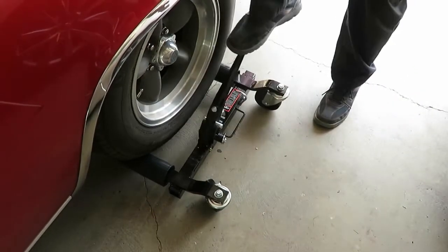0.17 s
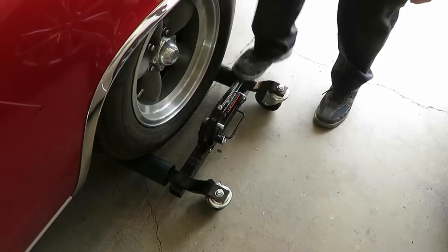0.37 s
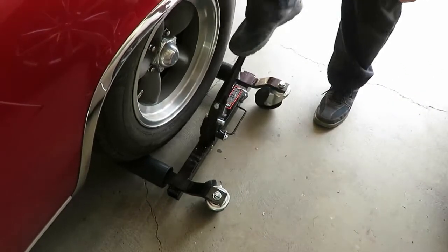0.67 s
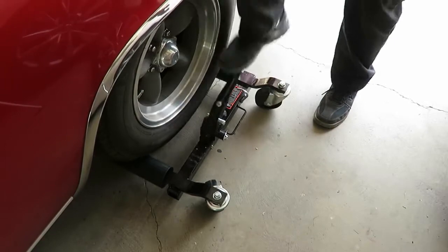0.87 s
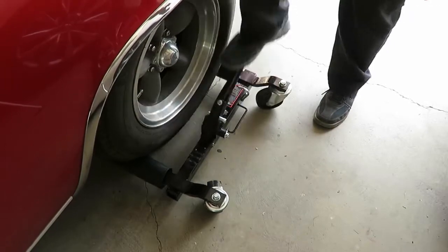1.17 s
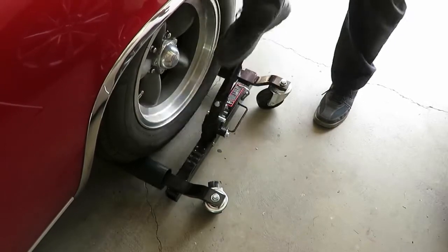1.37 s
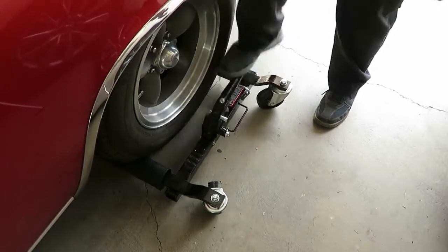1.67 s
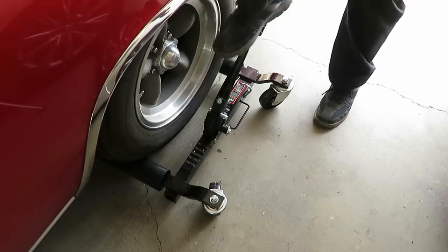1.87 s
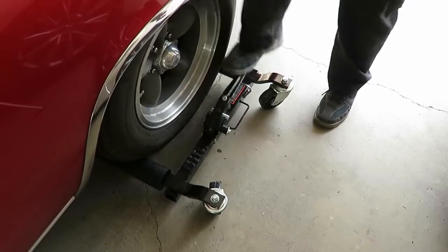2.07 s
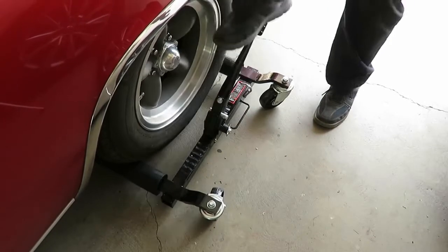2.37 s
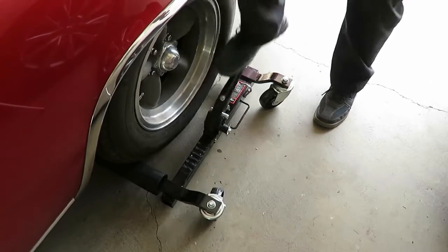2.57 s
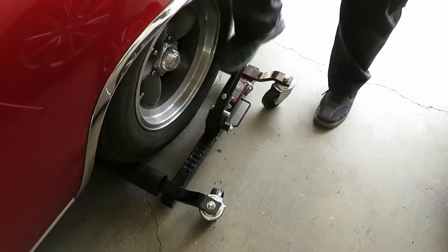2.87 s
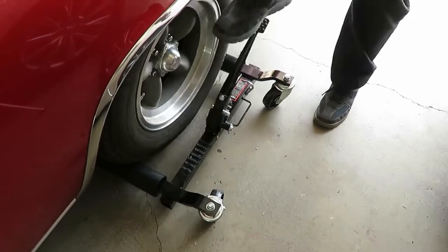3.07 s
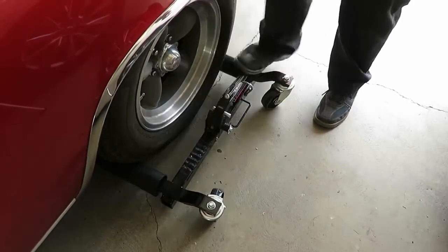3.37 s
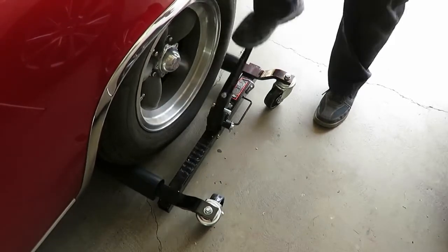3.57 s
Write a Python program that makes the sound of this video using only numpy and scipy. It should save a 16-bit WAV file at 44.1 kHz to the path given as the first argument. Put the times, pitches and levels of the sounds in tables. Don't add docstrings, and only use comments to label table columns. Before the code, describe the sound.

Close, loud ratchet clatter from a wheel dolly pedal, repeating about every half second, with creaks, faint pings and low tyre thumps; one brief squeak early on, hard-walled garage echo and faint outdoor air.

```python
import sys
import numpy as np
from scipy import signal
from scipy.fft import rfft, irfft
from scipy.io import wavfile
from scipy.ndimage import uniform_filter1d

SR = 44100
rng = np.random.default_rng(int(sys.argv[2]) if len(sys.argv) > 2 else 0)


def transcribe(signal):
    frames = np.atleast_2d(signal).T
    limited = np.clip(frames, -1, 1)
    pcm = np.round(limited * 32767).astype(np.int16)
    wavfile.write(sys.argv[1], SR, pcm)


def boost_factor(decibels):
    exponent = np.asarray(decibels, float) / 20
    return 10 ** exponent


N = 163170
LEAD = SR // 5


def evened(x):
    return x / np.sqrt(np.mean(x ** 2) + 1e-20)


def read(points, hz):
    f, value = np.transpose(points)
    return np.interp(np.log(hz + 1), np.log(f + 1), value)


def add(mix, s, sound):
    part = mix[..., LEAD + round(s * SR):][..., :sound.shape[-1]]
    part += sound[..., :part.shape[-1]]


def coloured(x, points):
    hz = np.fft.rfftfreq(x.shape[-1], 1 / SR)
    return irfft(rfft(x) * boost_factor(read(points, hz)), x.shape[-1])


def ringing(modes, length):
    t = np.arange(0, length, 1 / SR)
    return sum(boost_factor(db - 60 * t / t60) * np.sin(2 * np.pi * hz * t) for hz, db, t60 in modes)


def shaken(modes, force):
    body = ringing(modes, .6)
    jolts = force * rng.standard_normal(force.size)
    return signal.fftconvolve(jolts, body / np.linalg.norm(body))[:force.size]


def paired(z, hz):
    # frequency in Hz, left-right likeness from 0 to 1.
    likeness = [(100, 1), (600, 0.93), (2500, 0.86), (5000, 0.097), (10000, 0.017)]
    same = np.clip(read(likeness, hz), 0, 1)[:, None]
    return np.array([z[0], same * z[0] + np.sqrt(1 - same ** 2) * z[1]])


def air():
    # frequency in Hz, level in dB.
    air_colour = [(24, -26), (40, 8), (784, -26), (1780, -13), (7130, -25), (12600, -33), (15000, -31.5)]
    level_db = -44.5
    hz, _, z = signal.stft(rng.standard_normal((2, N)), SR, nperseg=1024)
    z = paired(z, hz) * boost_factor(read(air_colour, hz))[:, None]
    return boost_factor(level_db) * evened(signal.istft(z, SR, nperseg=1024)[1][:, :N])


def clacks():
    # start in seconds, peak in dB, thud share in dB, bright share in dB, strongest ring in Hz.
    first_clacks = [(.167, -13.5, -31, -18, 2200), (.189, -9, -16, -1, 5000),
                    (0.2007, -4, -11.5, -13, 3150), (.2262, -2.5, -18, -48, 2060),
                    (.2563, -8, -18, 1, 7300), (.358, -11, -23, -4.5, 7200), (.3676, -20, -38, 4, 5000),
                    (.4073, -19, -9.5, -6.5, 2720), (.4422, -16.5, -22, -21.5, 2260),
                    (.4856, -5, -17, -11.5, 1390), (.5325, -10.5, -17, -7.5, 2530),
                    (.595, -9.5, -8, -28, 2140), (.8129, -3, -22, -5.5, 1780), (.8405, -7, -8, -23, 2060),
                    (.8641, -4.5, -24, -1, 2130), (.879, -11.5, -19, -19, 2300),
                    (.8988, -8.5, -15, -11, 5000), (.9565, -11, -22, -2, 5500), (.9672, -5.5, -35, 0, 7000),
                    (1.0537, -13, -19, -15, 5060), (1.0852, -3, -9.5, -7, 4270),
                    (1.1246, -10.5, -37, -4.5, 6900)]
    middle_clacks = [(1.3569, -8, -29, -9, 1810), (1.3864, -4, -8, -9, 2070),
                     (1.4104, -5.5, -21, 1.5, 5870), (1.4378, -2.5, -14, -5, 2260),
                     (1.486, -12, -33, 3, 8000), (1.4976, -6.5, -34, 1, 6500),
                     (1.5429, -17.5, -16, -8, 5580), (1.6222, -13.5, -24, -15.5, 1740),
                     (1.657, -4.5, -9.5, -10, 1180), (1.693, -12, -12, -7.5, 1870),
                     (1.8926, -4, -28, -7, 5150), (1.9212, -5, -2.5, -3, 1940),
                     (1.9435, -5, -7, -1.5, 1930), (1.97, -6, -47, -13.5, 2260),
                     (2.0243, -13, -41, -1, 7000), (2.036, -12, -50, 3, 3330), (2.155, -30, 1, -17, 500),
                     (2.0812, -21.5, -27, -11, 2100), (2.096, -22, -31, -7.5, 3350),
                     (2.198, -12, -19, -10, 3330), (2.2256, -6.5, -14, -12, 2160),
                     (2.2711, -12.5, -27, -11, 2540)]
    last_clacks = [(2.4287, -16.5, 2, -11, 670), (2.462, -10, -37, -3, 2070), (2.4885, -5.5, -9, -11, 837),
                   (2.512, -3, -14, -4.5, 2940), (2.5358, -1.5, -21, -2, 4650), (2.59, -17, -46, -7, 7100),
                   (2.599, -9, -51, -3, 7440), (2.7615, -8.5, -19.5, -13.5, 4900),
                   (2.79, -4.5, -5, -9, 2320), (2.832, -13.5, -12, -8, 5140),
                   (2.8618, -6.5, -13, -18, 1550), (3.0578, -7, -40, -4.5, 8650),
                   (3.0946, -6, -9, -9.5, 2200), (3.1167, -4, -11, -0.5, 5970), (3.1417, -1, -19, -4, 4340),
                   (3.19, -19, -29, 0, 7500), (3.2033, -11.5, -51, -3, 7560), (3.3868, -35, 22, -24, 510),
                   (3.408, -32.5, -30, -17, 3330), (3.444, -12.5, -20.5, -11, 3500),
                   (3.478, -8, -10, -12, 2080), (3.522, -11, -12, -11, 2500),
                   (3.5416, -4.5, -20.5, -23, 1890)]
    earlier_clack = (3, -11.5, -29.5, 2097)
    # frequency in Hz, level in dB.
    frame_colour = [(250, -11), (600, -4.5), (1050, -9.5), (2100, 0.5), (5000, -2.5), (10200, -12),
                    (12700, -10.5), (15500, -23.5)]
    # frequency in Hz, time to fall 60 dB in seconds.
    ring_time = [(300, 0.066), (800, 0.056), (1800, 0.052), (5000, 0.029), (15000, 0.031)]
    # frequency in Hz, lift in dB.
    bars = [(608, 4.5), (780, 3), (1397, 7.5), (1652, 8), (1810, 4.5), (2073, 7.5), (2609, 6), (3330, 8),
            (5075, 8.5), (5900, 5), (7000, 9.5), (12400, 6)]
    # frequency in Hz, spread in radians.
    phase_spread = [(1000, 0.3), (3500, 0.7), (6500, 1.12), (12000, 2.15)]
    split_low_hz, split_high_hz = 1570, 3620
    usual_thud_db, usual_bright_db = -22.5, -11
    mode_spread_db, patch_db = 3, 2.5
    strongest_db, strongest_width = 6.5, 0.084
    thud_rise_turns, soft_s = 2.18, 0.00049
    snap_db, snap_s = 3, 0.0023
    crack_db, crack_s, clack_db = -6.5, 0.0025, -2
    rattle_s, rattle_db, rattle_fade_db = .009, -3, 11.5
    onset_s, onset_db = 0.01, -20

    out, t = np.zeros((2, N + LEAD)), np.arange(3072) / SR
    drawn_hz = 260 + 15300 * np.sort(rng.random(400)) ** 1.4
    hz, lift_db = drawn_hz.copy(), np.zeros(400)
    for bar_hz, db in bars:
        nearest = np.argmin(abs(drawn_hz - bar_hz))
        hz[nearest] += bar_hz - drawn_hz[nearest]
        lift_db[nearest] += db
    t60 = read(ring_time, hz)
    modes = np.exp(np.outer(2j * np.pi * hz - np.log(1000) / t60, t))
    modes *= 1 - np.exp(-np.outer(hz, t) / thud_rise_turns)
    modes *= (1 - np.exp(-t / soft_s)) * boost_factor(snap_db * np.exp(-t / snap_s))
    low = 1 / (1 + (hz / split_low_hz) ** 4)
    high = 1 / (1 + (split_high_hz / hz) ** 4)
    usual_db = read(frame_colour, hz) + lift_db + 10 * np.log10(hz ** 0.12 / t60)

    table = [(-.1, *earlier_clack), *first_clacks, *middle_clacks, *last_clacks]
    for s, peak_db, thud_db, bright_db, ring_hz in table:
        luck, turn, patch = rng.standard_normal((3, hz.size))
        db = usual_db + mode_spread_db * luck * (1 + high)
        db += patch_db * (1 - 0.81 * low) * evened(uniform_filter1d(patch, size=14))
        db += low * (thud_db - usual_thud_db)
        db += high * (hz / 6000) ** 0.83 * (bright_db - usual_bright_db)
        db += strongest_db * np.exp(-(np.log(hz / ring_hz) / strongest_width) ** 2)
        side = np.exp(.5j * turn * read(phase_spread, hz))
        size = boost_factor(db) * np.exp(2j * np.pi * rng.random(hz.size))
        ring = (np.array([size * side, size / side]) @ modes).real
        ring = ring / np.sqrt(np.mean(ring[:, :200] ** 2))
        crack = evened(coloured(rng.standard_normal(t.size), frame_colour)) * np.exp(-t / crack_s)
        blow = ring + boost_factor(crack_db + min(bright_db - usual_bright_db, 0)) * crack

        when, hard = rng.random((2, 8))
        blows = np.zeros(1024)
        places = np.clip(when * rattle_s * SR, 1, 1023).astype(int)
        blows[places] = boost_factor(rattle_db - rattle_fade_db * when) * (2 * hard - 1)
        blows[0] = 0.62 + 0.22 * hard[0]
        rattled = signal.fftconvolve(blow, blows[None], axes=1)
        add(out, s, boost_factor(peak_db + clack_db) * rattled / abs(rattled.mean(0)).max())

        onset = evened(np.diff(rng.standard_normal((2, 801)))) * np.exp(-t[799::-1] / onset_s)
        add(out, s - 800 / SR, boost_factor(peak_db + onset_db + .5 * min(bright_db, 0)) * onset)
    return out


def strokes():
    # start in seconds, length in seconds, scrape in dB, boom in dB, thump in dB.
    pedal_strokes = [(0.155, 0.098, -27, -39, -48), (0.488, 0.04, -46, -43.5, -32.5),
                     (0.778, 0.23, -33.5, -33, -42), (1.076, 0.031, -26, -40, -31.5),
                     (1.332, 0.16, -29.5, -37.5, -48), (1.649, 0.073, -33, -42.5, -30),
                     (1.862, 0.17, -31, -44.5, -57), (2.233, 0.061, -36, -46.5, -31.5),
                     (2.434, 0.117, -29, -46, -39), (2.797, 0.064, -34, -49, -34),
                     (3.028, 0.12, -31, -46, -48), (3.487, 0.078, -42, -53, -40.5)]
    # frequency in Hz, level in dB.
    scrape_colour = [(150, -34), (250, -21), (2280, 4), (8320, -2), (10200, -8.5), (12600, -4.5),
                     (15500, -11)]
    # frequency in Hz, level in dB, time to fall 60 dB in seconds.
    car_modes = [(49.4, -1.5, 0.57), (95, -3.5, 0.27)]
    floor_modes = [(140.5, -3.5, 0.12), (195.5, 7, 0.079), (347.5, 2.5, 0.055)]
    scrape_edge_s, boom_s, thump_s = 0.011, 0.082, 0.025
    grit_db, grit_per_s = 1, 1800

    t = np.arange(-LEAD, N) / SR
    travel, load, jolt = np.zeros((3, t.size))
    for s, length, scrape_db, boom_db, thump_db in pedal_strokes:
        since = np.maximum(t - s, 0)
        inside = np.minimum(t - s, s + length - t)
        travel += boost_factor(scrape_db) * np.clip(inside / scrape_edge_s, 0, 1)
        load += boost_factor(boom_db) * since / boom_s * 5 * np.exp(-2 * since / boom_s)
        jolt += boost_factor(thump_db) * (t > s) * np.exp(-since / thump_s)
    grain = boost_factor(grit_db * np.minimum(rng.exponential(1, t.size), 4))
    grit = grain * (rng.random(t.size) < grit_per_s / SR)
    chatter = np.sqrt(abs(signal.lfilter([1], [1, -.985], grit ** 2)))
    scrape = travel * evened(coloured(chatter * rng.standard_normal(t.size), scrape_colour))
    return scrape + 2 * shaken(car_modes, load) + 2 * shaken(floor_modes, jolt)


def take_ups():
    # start in seconds, creak in dB, heave in dB.
    slack_ends = [(0.165, -27.5, -45), (.791, -31.5, -21.5), (1.335, -33.5, -24.5), (1.8724, -31.5, -20.5),
                  (2.4406, -29.5, -21.5), (3.036, -33, -34)]
    # frequency in Hz, level in dB, time to fall 60 dB in seconds.
    lever_modes = [(3330, 7.5, 0.017), (2268, 0, 0.078), (1696, -8, 0.12), (5000, -9.5, 0.049)]
    tyre_modes = [(50.4, -8.5, 0.83), (95, 2, 0.1), (152.5, -3, .12)]
    creak_s, heave_rise_s = 0.02, 0.0076

    t = np.arange(-LEAD, N) / SR
    strain, out = np.zeros((2, t.size))
    heave = ringing(tyre_modes, .6)
    heave = heave * (1 - np.exp(-np.arange(heave.size) / SR / heave_rise_s))
    for s, creak_db, heave_db in slack_ends:
        strain += boost_factor(creak_db) * (t > s) * np.exp(-np.maximum(t - s, 0) / creak_s)
        add(out, s, boost_factor(heave_db) * heave)
    return out + 2 * shaken(lever_modes, strain)


def squeak():
    # start in seconds, level in dB.
    chirps = [
        (0.7724, -15),
        (0.7804, -21),
    ]
    pitch_hz, sag_hz_per_s, width_s, octave_db = 6190, 13700, 0.0031, -9.5
    swell, t = np.zeros(N + LEAD), np.arange(1200) / SR
    since = np.arange(-LEAD, N) / SR - chirps[0][0]
    turns = 2 * np.pi * (pitch_hz * since - .5 * sag_hz_per_s * since ** 2)
    for s, db in chirps:
        add(swell, s - .003, boost_factor(db) * np.exp(-(t / width_s - 2) ** 2))
    return swell * (np.sin(turns) + boost_factor(octave_db) * np.cos(2 * turns))


def pings():
    # start in seconds, level in dB.
    drops = [(0.8985, -22.5), (1.437, -21.5), (1.9707, -24), (2.5396, -24), (3.1406, -24.5)]
    # frequency in Hz, level in dB, time to fall 60 dB in seconds.
    pawl_modes = [(4533, -5, .24), (8515, 0, .135), (13870, -11, .1)]
    out = np.zeros(N + LEAD)
    for s, db in drops:
        add(out, s, boost_factor(db) * ringing(pawl_modes, 0.28))
    return out


def garage(x):
    # frequency in Hz, time to fall 60 dB in seconds.
    echo_time = [(100, 0.19), (500, 0.55), (2500, 0.46), (7700, 0.36), (14000, 0.17)]
    # frequency in Hz, echo level in dB.
    echo_colour = [(100, -3), (2000, -5), (7000, -6.5), (14000, -6.5)]
    hop = 128
    hz, _, z = signal.stft(x, SR, nperseg=512, noverlap=512 - hop)
    power = uniform_filter1d(abs(z) ** 2, size=5, axis=0)
    keep = boost_factor(-120 * hop / SR / read(echo_time, hz))
    stored = np.array([signal.lfilter([0, 0, 1 - k], [1, -k], row) for k, row in zip(keep, power)])
    waves = signal.stft(rng.standard_normal((2, x.size)), SR, nperseg=512, noverlap=512 - hop)[2]
    field = paired(waves / np.sqrt(np.mean(abs(waves) ** 2)), hz)
    field = field * np.sqrt(abs(stored)) * boost_factor(read(echo_colour, hz))[:, None]
    return signal.istft(field, SR, nperseg=512, noverlap=512 - hop)[1][:, :x.size]


def scene():
    dolly = clacks() + pings() + strokes() + take_ups() + squeak()
    return (dolly + garage(dolly.mean(0)))[:, LEAD:] + air()


def gated(x):
    # frequency in Hz, level in dB.
    gate = [(8500, -47), (10000, -14.5), (14000, -27.5), (15500, 1)]
    edge_hz = 16000
    hz, _, z = signal.stft(x, SR, nperseg=1024)
    power = (abs(z) ** 2).mean(0)
    bands = np.repeat(power[:512].reshape(32, 16, -1).mean(1), 16, axis=0)
    bands = np.vstack([bands, bands[-1:]])
    under_db = 10 * np.log10((bands + 1e-20) / (power.mean(0) + 1e-20))
    kept = np.clip(under_db - read(gate, hz)[:, None], 0, 1) * (hz < edge_hz)[:, None]
    return signal.istft(z * kept, SR, nperseg=1024)[1][:, :N]


def band_limit(x):
    return signal.sosfilt(signal.butter(12, 16250, fs=SR, output="sos"), x)


def record(dry):
    low_cut_hz, full_scale, left_db = 53.3, .95, -.7
    low_cut = signal.butter(N=3, Wn=low_cut_hz, btype="high", fs=SR, output="sos")
    cut = signal.sosfilt(low_cut, dry)
    limited = cut / (1 + (cut / full_scale) ** 4) ** 0.21
    mix = gated(limited) * boost_factor([[left_db / 2], [-left_db / 2]])
    return band_limit(mix)


dry = scene()
out = record(dry)
transcribe(out)
```